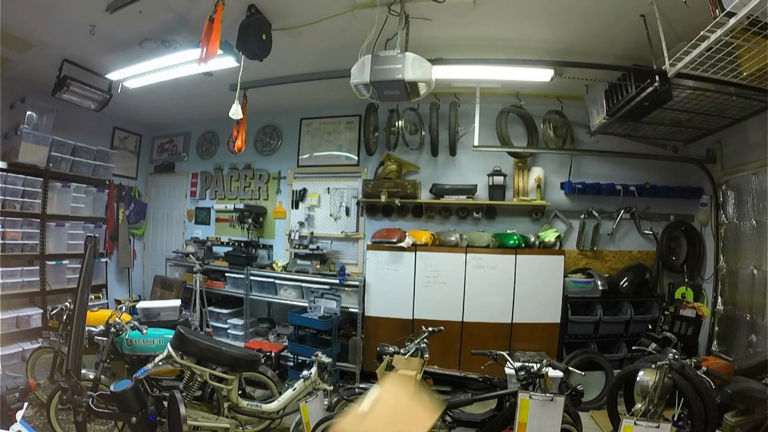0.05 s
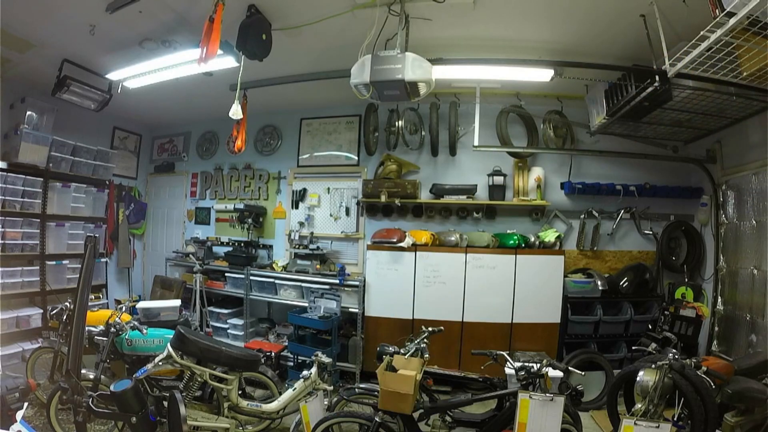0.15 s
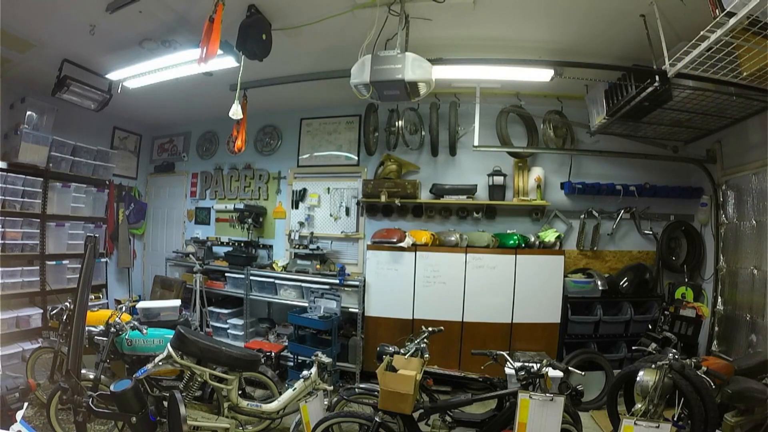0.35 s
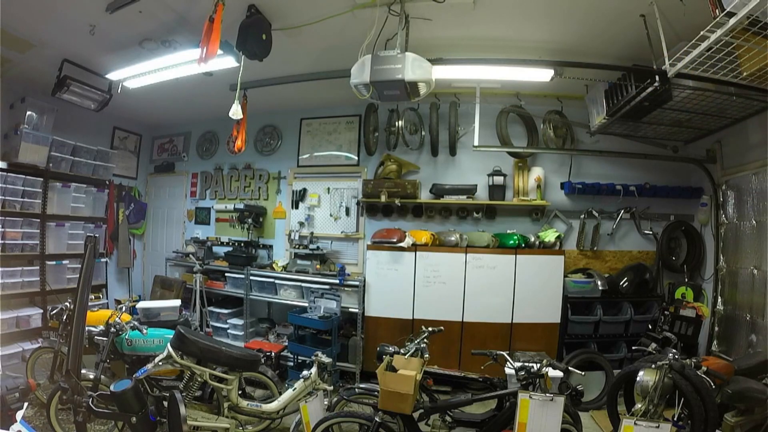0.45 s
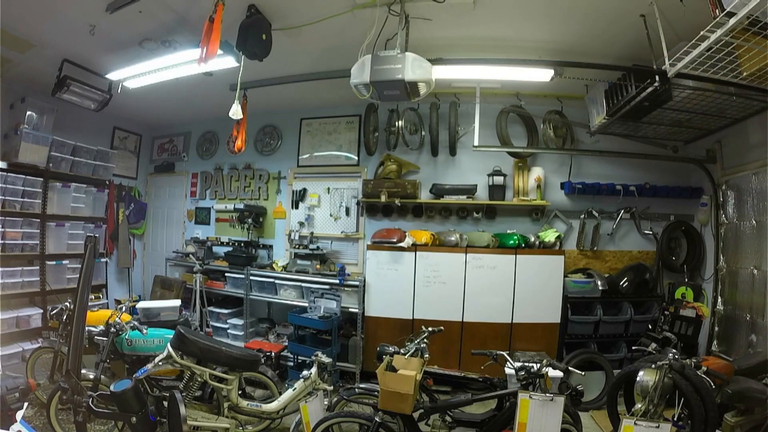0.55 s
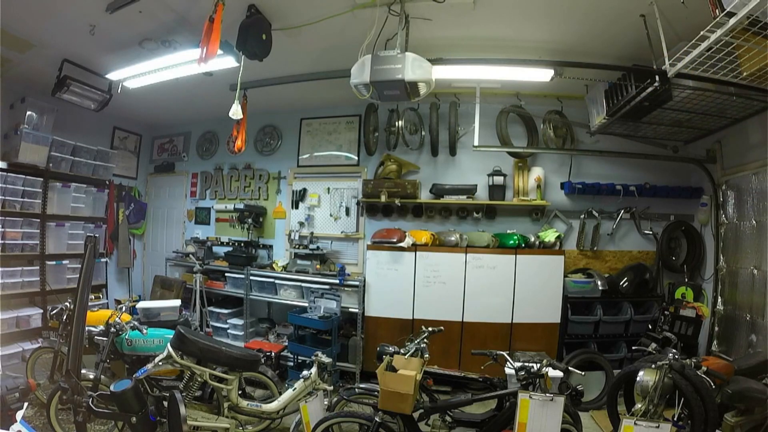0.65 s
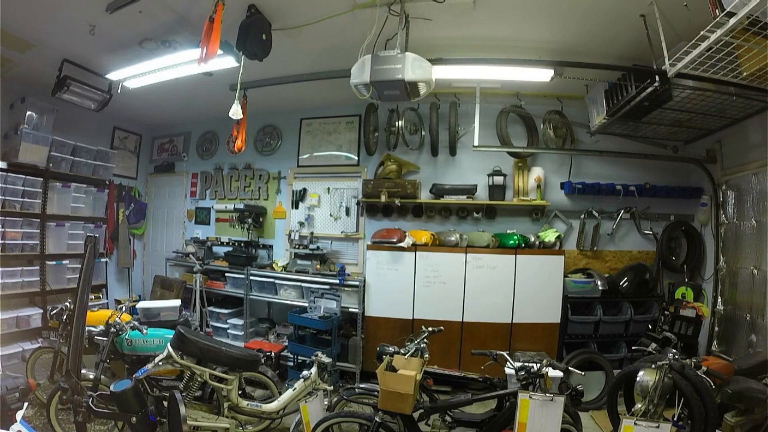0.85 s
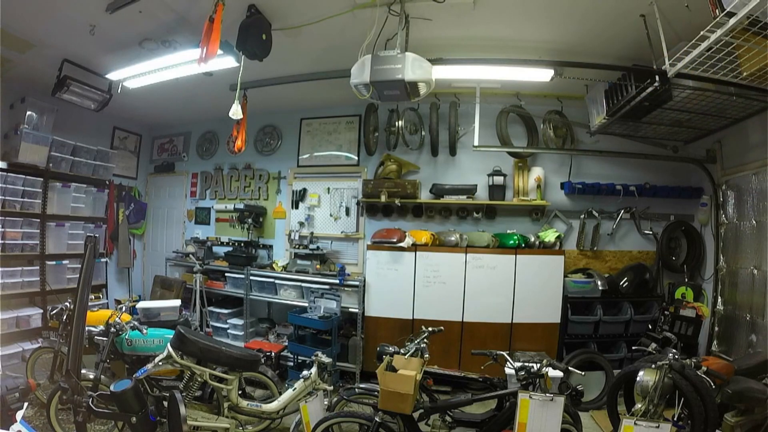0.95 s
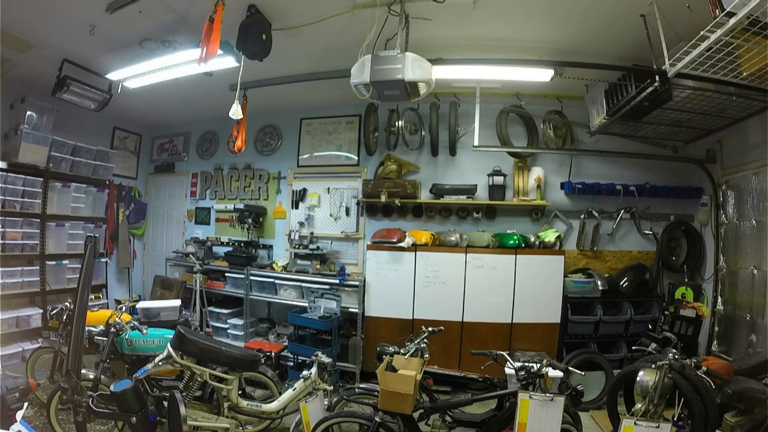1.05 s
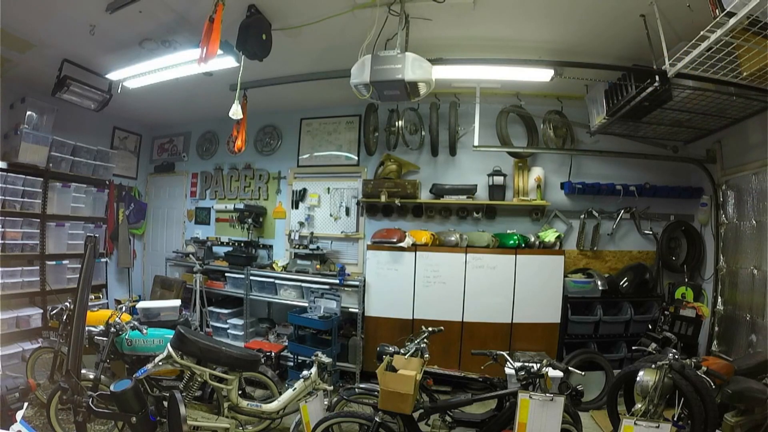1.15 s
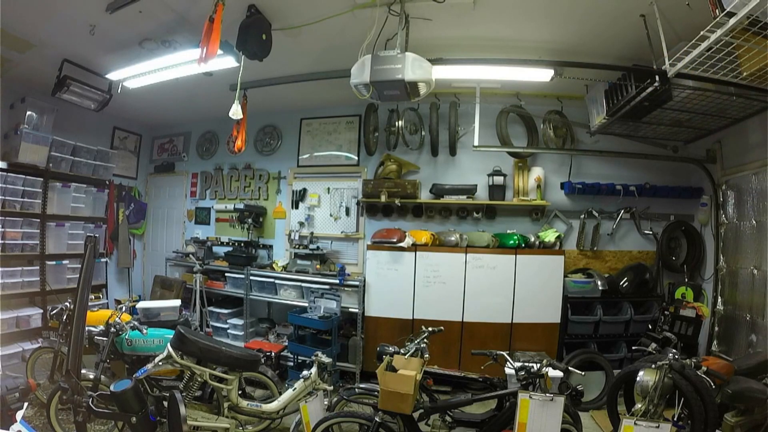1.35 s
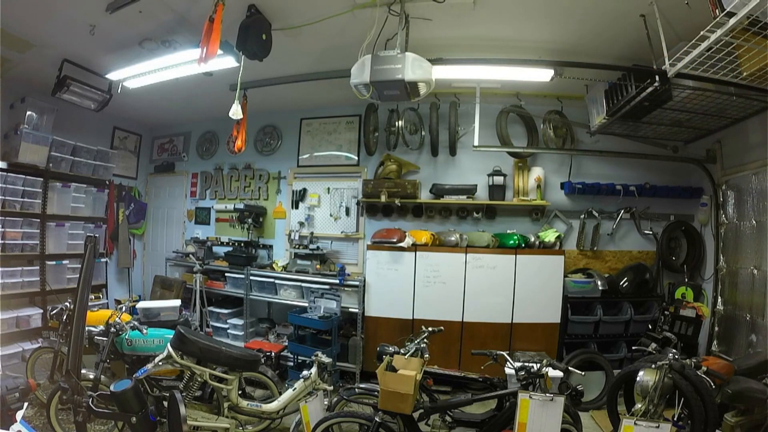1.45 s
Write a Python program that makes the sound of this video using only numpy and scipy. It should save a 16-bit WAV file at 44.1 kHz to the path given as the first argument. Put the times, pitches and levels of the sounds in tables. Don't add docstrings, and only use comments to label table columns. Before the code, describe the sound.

Loud flat thud of a thrown cardboard box, a softer knock as it bounces, brief gritty scuffing

```python
import sys
import numpy as np
from scipy import signal
from scipy.fft import rfft, irfft, next_fast_len
from scipy.io import wavfile
from scipy.ndimage import map_coordinates

SR = 44100
rng = np.random.default_rng(int(sys.argv[2]) if len(sys.argv) > 2 else 0)


def ratio(d):
    e = np.asarray(d, float) / 20
    return 10 ** e


def generate_wav(sig):
    pcm = np.round(np.clip(np.atleast_2d(sig).T, -1, 1) * 32767).astype(np.int16)
    wavfile.write(sys.argv[1], SR, pcm)


N = 66150


def unit(x):
    return x / np.sqrt(np.mean(x ** 2) + 1e-20)


def along(points, hz):
    point_hz, value = np.transpose(points)
    return np.interp(np.log(hz + 1), np.log(point_hz + 1), value)


def curve(rows):
    s, db = np.transpose(rows)
    return np.interp(np.arange(N) / SR, s, db, left=-150, right=-150)


def wobble(rate):
    knots = rng.standard_normal(int(N * rate / SR) + 4)
    return map_coordinates(knots, [np.arange(N) * rate / SR])


def coloured(x, gain_db):
    m = 2 * next_fast_len(len(x) // 2 + 4096)
    log_gain = np.log(ratio(gain_db(np.fft.rfftfreq(m, 1 / SR))) + 1e-6)
    cepstrum = irfft(log_gain, m)
    cepstrum[1:m // 2] *= 2
    cepstrum[m // 2 + 1:] = 0
    return irfft(rfft(x, m) * np.exp(rfft(cepstrum)), m)[:len(x)]


def noise(spectrum):
    white = rng.standard_normal(2 * N)
    return unit(coloured(white, lambda hz: along(spectrum, hz))[N:])


def add(track, s, sound):
    part = track[round(s * SR):][:len(sound)]
    part += sound


def impulse(t):
    return 1. * (t == 0)


BLOW_TIMES = [
    .2303,
    .5462,
    1.0825,
]
# (level [dB], contact time [s], room share [dB], panel ring [dB], ring length [factor])
BLOW_STRENGTHS = [
    (-3.5, 0.0094, 3, -2.5, 0.89),
    (-18, 0.009, -4.5, -11.5, 0.44),
    (-46.5, 0.0063, -6, -17, 0.12),
]
# (frequency [Hz], level [dB])
BLOW_SPECTRA = [
    [(40, -16), (110, -16), (200, -16.5), (400, -5.5), (860, -1), (1000, -9.5), (3600, -18), (5000, -20.5),
     (9000, -27.5), (16000, -47.5)],
    [(60, -33), (185, 0), (250, -6), (400, -2.5), (650, -3.5), (850, -9), (1450, -7), (6000, -41.5)],
    [(100, -1), (250, -12.5), (580, -7), (800, -10.5), (2200, -29), (6000, -60)],
]


def box_blows():
    out, t = np.zeros(2 * N), np.arange(N) / SR
    rise = t / (.002 + t)
    blows = zip(BLOW_TIMES, BLOW_STRENGTHS, BLOW_SPECTRA)
    for k, (s, (db, contact_s, room_db, ring_db, longer), spectrum) in enumerate(blows):
        crush = rise * np.exp(-t / contact_s) * rng.standard_normal(N)
        crush = crush / np.linalg.norm(crush)
        gain_db = lambda hz: along(spectrum, hz) + body_lift_db(hz)
        direct_peak = np.abs(coloured(crush, gain_db)).max()
        excitation = ceiling_echo(crush) + ratio(room_db) * garage(impulse(t))
        body = coloured(excitation, gain_db) / direct_peak
        ring = ceiling_echo(rise * panel_ring(t, spectrum, longer))
        slow = slow_ringers(t) * ratio(4.5 * (k == 1))
        add(out, s, ratio(db) * (body + ratio(ring_db) * ring + slow))
    return out[:N]


# (frequency [Hz], width [Hz], lift [dB])
BODY_RESONANCES = [(181, 15, 3.5), (392, 130, 7.5), (608.5, 50, 6.5), (812, 130, 2.5), (1050, 370, -4),
                   (1540, 180, 1.5), (3310, 630, 6)]


def body_lift_db(hz):
    return sum(db / (1 + (2 * (hz - centre) / width) ** 2) for centre, width, db in BODY_RESONANCES)


# (frequency [Hz], level over the blow's spectrum [dB], t60 [s])
PANEL_MODES = [(105, 1.5, 0.27), (364.8, 2, 0.23), (393.5, 2, 0.13), (585.3, -3.5, 0.15), (719, -2, 0.16),
               (814, 2.5, 0.1), (1437, 2.5, 0.14)]


def panel_ring(t, spectrum, longer):
    ring = 0
    for hz, level, t60 in PANEL_MODES:
        envelope = ratio(level + along(spectrum, hz) - 60 * t / (t60 * longer))
        ring = ring + envelope * np.sin(2 * np.pi * hz * t + 1.1 * wobble(45))
    return ring


# (frequency [Hz], level [dB], t60 [s])
SLOW_MODES = [(65.3, -25.5, .85), (103.7, -33.5, 1.3), (197, -47, 0.37), (398, -49, 2.1)]


def slow_ringers(t):
    ring = 0
    for hz, level, t60 in SLOW_MODES:
        envelope = ratio(level - 60 * t / t60 + 2.2 * wobble(14))
        ring = ring + envelope * np.sin(2 * np.pi * hz * t + .45 * wobble(10))
    return ring * (1 - np.exp(-t / .015))


# (time [s], level [dB])
SCUFF_LEVEL = [(0.545, -74), (0.551, -50.5), (0.579, -50.5), (0.647, -57), (0.715, -58.5), (0.755, -65.5),
               (0.779, -65.5), (0.825, -81.5), (1.07, -81.5)]
# (frequency [Hz], level [dB])
SCUFF_SPECTRUM = [(120, -55.5), (200, -8), (722, -6.5), (1100, -8.5), (1210, -11.5), (1590, -22.5),
                  (7540, -25.5), (16000, -36)]
# (frequency [Hz], level [dB])
DRAG_SPECTRUM = [(60, -73), (120, -5), (400, -14.5), (900, -6.5), (2000, -32), (4000, -34)]
# (start [s], end [s])
DRAG_SPAN = (.64, 1.06)


def slide():
    t = np.arange(N) / SR
    scuff_db = curve(SCUFF_LEVEL) + 7.5 + 2.5 * wobble(110) + 0.79 * wobble(600)
    grit = ratio(scuff_db) * noise(SCUFF_SPECTRUM)
    start_s, end_s = DRAG_SPAN
    on = np.clip(np.minimum(t - start_s, end_s - t) / .04, 0, 1)
    drag_db = -71 - 24 * (t - start_s) + 2.0 * wobble(38)
    drone = on * ratio(drag_db) * noise(DRAG_SPECTRUM)
    return grit + ratio(-9) * garage(grit) + drone


TICK_TIMES = [.093, .581, .6565, .667, .6935, .697, .766, .86, .947, .955, 1.245]
TICK_LEVELS = [-80, -53, -38, -46, -40, -55, -63, -64, -58, -62, -70]
TICK_PITCHES = [7000, 6000, 3800, 3300, 2000, 11000, 12000, 6000, 1800, 4000, 8000]
TICK_LENGTHS = [.0002, .001, .0002, .001, .0004, .0001, .0001, .0002, .0003, .0001, .0004]


def ticks():
    out, t = np.zeros(2 * N), np.arange(SR // 2) / SR
    for s, db, hz, length in zip(TICK_TIMES, TICK_LEVELS, TICK_PITCHES, TICK_LENGTHS):
        envelope = np.e * t / length * np.exp(-t / length)
        click = envelope * np.sin(2 * np.pi * hz * t)
        ring = coloured(garage(impulse(t)), lambda f: -12 * np.log2(f / hz + 1e-3) ** 2)
        ring = ratio(5) * np.linalg.norm(click) * ring / np.linalg.norm(ring)
        add(out, s, ratio(db) * (click + ring))
    return out[:N]


def ceiling_echo(x):
    return x + ratio(-5) * np.roll(x, round(.022 * SR))


# (frequency [Hz], t60 [s])
GARAGE_DECAY = [(100, .6), (400, .41), (1000, .4), (3600, .42), (4500, .35), (8000, .29), (14000, .24)]


def garage(x):
    hz, t, z = signal.stft(rng.standard_normal(SR), SR, nperseg=256)
    decay = ratio(-60 * t / along(GARAGE_DECAY, hz)[:, None])
    tail = signal.istft(z * decay, SR, nperseg=256)[1]
    tail = np.pad(tail / np.linalg.norm(tail), (round(.006 * SR), 0))
    return signal.fftconvolve(x, tail)[:len(x)]


# (time [s], level [dB])
HUM_LEVEL = [(0, 1), (.08, -0.5), (.2, 3), (.9, 2.5), (.99, 2.5), (1.05, 5.5), (1.15, 2), (1.21, 10.5),
             (1.31, -2.5), (1.39, 1), (1.5, -1)]
# (frequency [Hz], level [dB])
HUM_SPECTRUM = [(20, -28.5), (45, -5.5), (66, 4.5), (115, -7.5), (180, -24), (400, -28), (1500, -40),
                (3000, -63.5)]


def appliance_hum():
    return ratio(-65.5 + curve(HUM_LEVEL) + 1.5 * wobble(12)) * noise(HUM_SPECTRUM)


# (time [s], level [dB])
RUSTLE_LEVEL = [(0, -82), (.2, -91), (.5, -93.5), (.85, -70), (.93, -75), (.955, -67), (1.0, -80.5),
                (1.06, -77.5), (1.12, -70.5), (1.2, -73), (1.26, -71), (1.35, -74), (1.5, -72)]
# (frequency [Hz], level [dB])
CLOTH_SPECTRUM = [(150, -42.5), (300, -8.5), (600, -5.5), (1000, -8), (3000, -15), (8000, -17),
                  (11000, -28.5), (16000, -27)]


def rustle():
    return ratio(curve(RUSTLE_LEVEL) + 0.4 * wobble(30)) * noise(CLOTH_SPECTRUM)


def scene():
    mono = box_blows() + slide() + ticks() + appliance_hum() + rustle()
    return np.tile(mono, (2, 1))


def roll_off(x):
    return signal.sosfilt(signal.butter(12, 16450, fs=SR, output="sos"), x)


def record(dry):
    clip_top, clip_hard = .33, 12
    x = dry / (1 + np.abs(dry / clip_top) ** clip_hard) ** (1 / clip_hard)
    x = signal.lfilter(*signal.butter(1, 41.7, 'high', fs=SR), x)
    x = x + ratio(-90.5) * rng.standard_normal(x.shape)
    x = signal.sosfilt(signal.ellip(10, .5, 60, 15800, fs=SR, output='sos'), x)
    return roll_off(x)


dry = scene()
out = record(dry)
generate_wav(out)
```